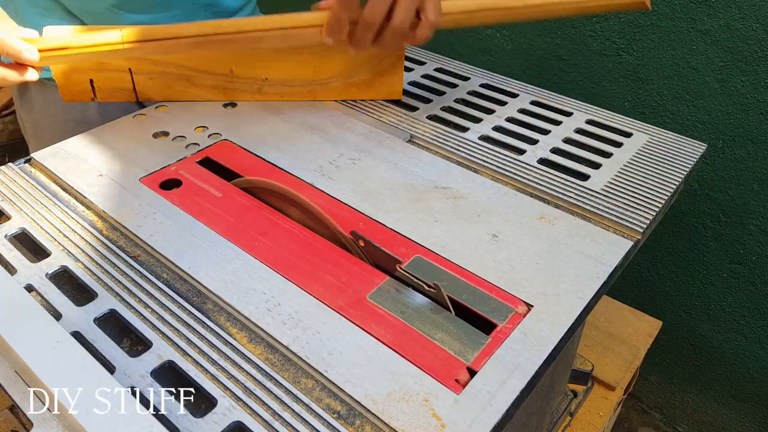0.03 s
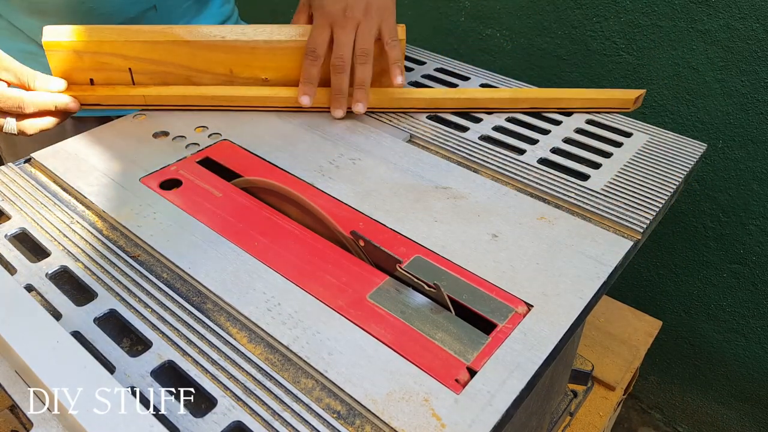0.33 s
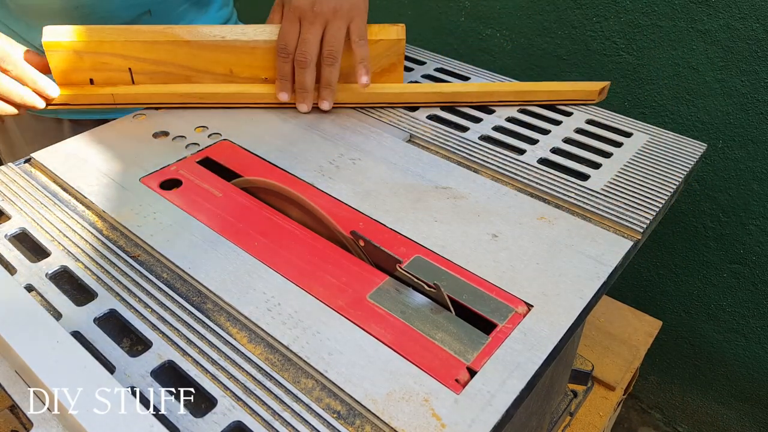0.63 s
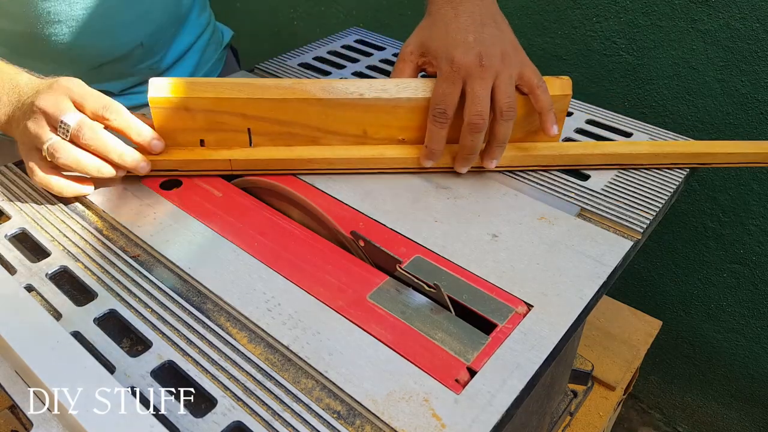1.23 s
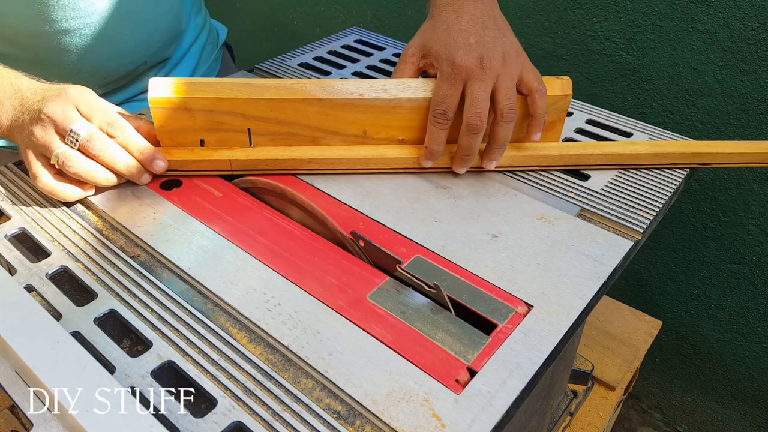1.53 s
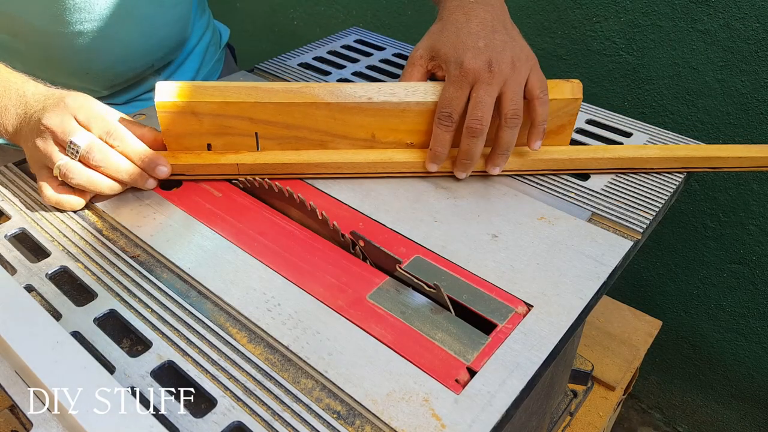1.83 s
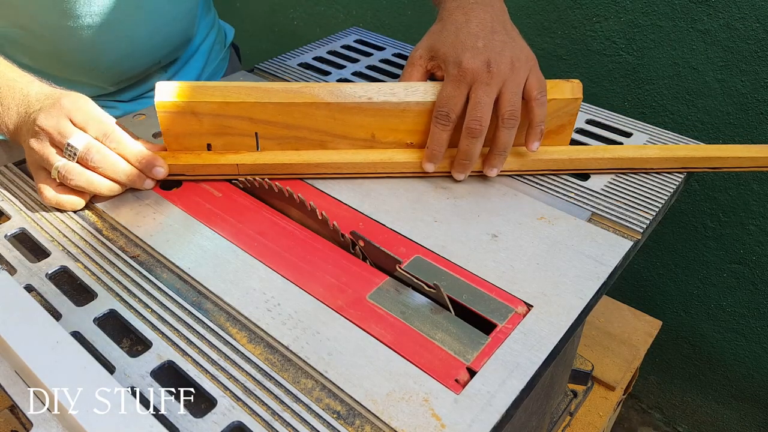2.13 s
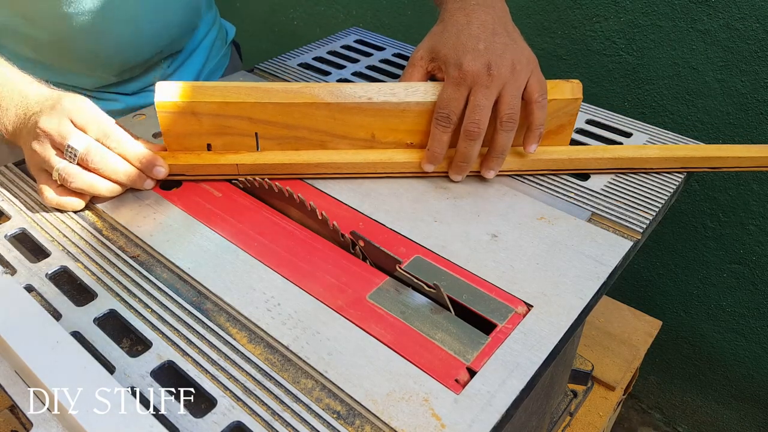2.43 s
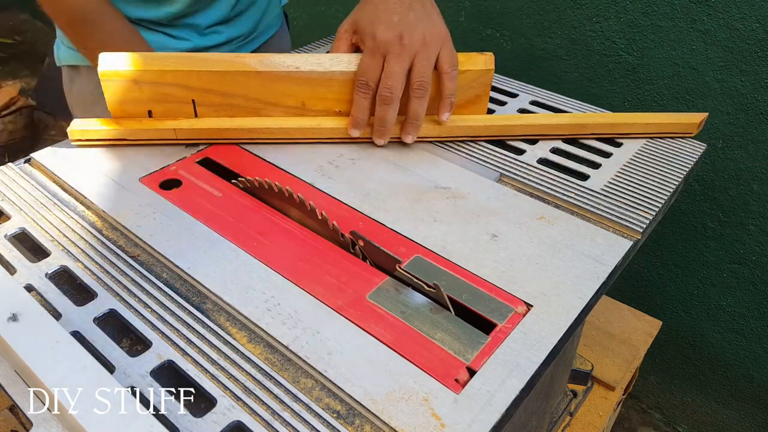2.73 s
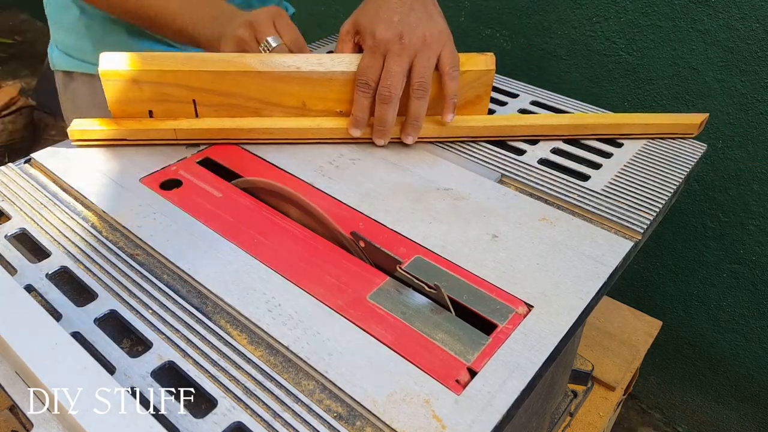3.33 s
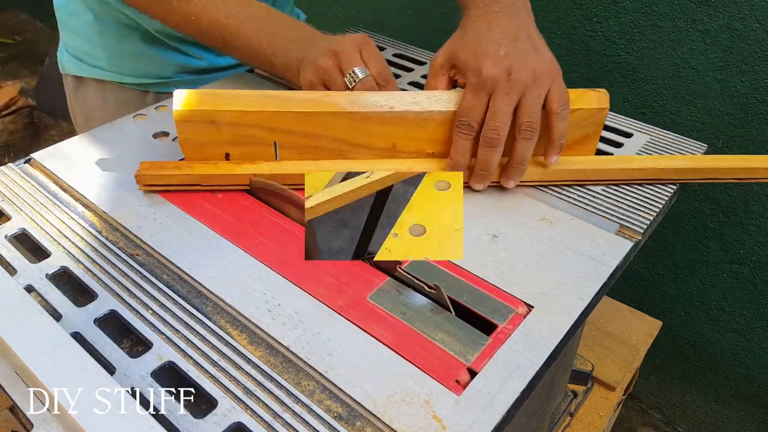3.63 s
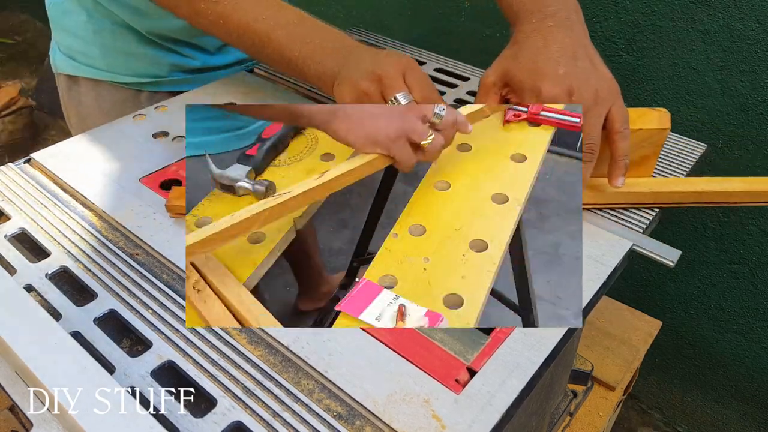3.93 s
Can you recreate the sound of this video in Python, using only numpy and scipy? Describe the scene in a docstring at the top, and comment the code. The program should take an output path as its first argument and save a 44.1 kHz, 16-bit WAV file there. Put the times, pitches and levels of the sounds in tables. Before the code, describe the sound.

A table saw coasts to a rattling stop, wood knocks and slides, then it restarts.

```python
"""Table saw stopping and restarting

A table saw, switched off, coasts down: its loose gears rattle in the housing, the motor whine sinks.
A wooden jig knocks and slides on the table, and faint high chirps dot the lull.
Then the saw starts again with a jolt and a mains buzz, and gears, fan and air whir up to full speed."""
import sys
import numpy as np
from scipy import signal
from scipy.fft import rfft, irfft, next_fast_len
from scipy.io import wavfile
from scipy.ndimage import map_coordinates

SR = 44100
rng = np.random.default_rng(int(sys.argv[2]) if len(sys.argv) > 2 else 0)


def transcribe(u):
    """Save the signal u as a 16-bit wav file named by the first command-line argument.

    u: samples, shape (n,) or (channels, n), limited to [-1, 1]; the rate is SR.
    q: integer samples, one column per channel.
    """
    v = np.clip(np.atleast_2d(u).T, -1, 1)
    q = np.round(v * 32767).astype(np.int16)
    wavfile.write(sys.argv[1], SR, q)


N = 176400
TIME = np.arange(N) / SR
COAST_HZ, STOP_S = 487.3, 1.88  # rotor speed at switch-off; moment of standstill
START_S, MAINS_PULSE_HZ = 3.157, 120
SINCE_START = np.maximum(TIME - START_S, 0)

# Faders of the coast-down, ahead of each layer's trim: time_s, housing_db, grind_db, rattle_db, hiss_db
COAST_FADERS = [(0, -30.5, -35.5, -25, -30), (.3, -28.5, -39, -26, -31.5), (.58, -30.5, -36, -26.5, -34),
                (.8, -33.5, -38, -26.5, -34.5), (1.08, -32, -34, -27, -36.5),
                (1.43, -34.5, -31.5, -35, -43), (1.54, -31.5, -34.5, -38, -49.5),
                (1.71, -37, -42.5, -50.5, -57), (1.745, -33, -50, -51, -65.5)]
# Modes of the blade and its shaft: pitch_hz, width_hz, level_db
BLADE_MODES = [(2460, 180, -4.5), (2727, 130, 2.5), (2954, 120, -0.5), (3275, 108, 4), (3650, 620, -7),
               (4310, 550, -8.5)]
# Faders of the run-up, ahead of each layer's trim: time_s, housing_db, gears_db, air_db
RUN_FADERS = [(3.157, -12, -8, -12), (3.172, -14, -9, -13.5), (3.205, -16.5, -16.5, -19),
              (3.255, -17, -21, -19.5), (3.32, -24, -27.5, -21), (3.44, -23, -31, -16.5),
              (3.6, -31.5, -25, -18), (3.652, -27, -34, -19.5), (3.68, -54, -19.5, -25),
              (3.87, -39, -25.5, -25), (4, -33, -34, -28.5)]


def amp(db):
    """Decibels to gain."""
    return 10 ** (np.asarray(db) / 20)


def unit(x):
    """x scaled to rms 1."""
    return x / np.sqrt(np.mean(x ** 2) + 1e-20)


def along(points, hz):
    """Read (frequency_hz, value) points on a log frequency axis."""
    knots_hz, values = np.transpose(points)
    return np.interp(np.log(hz + 1), np.log(knots_hz + 1), values)


def curves(rows):
    """One automation curve for each column after the time."""
    times, *columns = np.transpose(rows)
    return [np.interp(TIME, times, column) for column in columns]


def wobble(knots_per_s):
    """A smooth random curve."""
    return map_coordinates(rng.standard_normal(int(N * knots_per_s / SR) + 4), [TIME * knots_per_s])


def noise():
    """Mid and side white noise."""
    return rng.standard_normal((2, N))


def filtered(x, response):
    """x through a response given as a function of frequency."""
    size = next_fast_len(N + SR // 2)
    return irfft(rfft(x, size) * response(np.fft.rfftfreq(size, 1 / SR)), size)[..., :N]


def coloured(x, eq):
    """x through a (frequency_hz, gain_db) curve that keeps the power of white noise."""
    return filtered(x, lambda hz: unit(amp(along(eq, hz))))


def ringing(x, modes):
    """x through resonances with steep outer skirts, keeping the power of white noise."""
    def response(hz):
        gain = sum((-1) ** k * amp(db) * 1j * hz * width / (pitch ** 2 - hz ** 2 + 1j * hz * width)
                   for k, (pitch, width, db) in enumerate(modes))
        low, high = 1j * hz / (0.5 * modes[0][0]), 1j * hz / (1.74 * modes[-1][0])
        gain = gain * low ** 2 / (1 + low + low ** 2) / (1 + high + high ** 2)
        return gain / np.sqrt(np.mean(abs(gain) ** 2))
    return filtered(x, response)


def struck(start_s, t60_s):
    """An envelope that jumps up and dies away."""
    age = TIME - start_s
    return (age >= 0) * amp(-60 * np.maximum(age, 0) / t60_s)


def swell(peak_s, rise_s, fall_s):
    """A bell-shaped rise to 1 and fall."""
    return np.exp(-((TIME - peak_s) / np.where(TIME < peak_s, rise_s, fall_s)) ** 2)


def tones(hz, partials, flutter_db=1.5):
    """Mid and side partials (multiple, level_db) of a pitch, each fluttering by itself."""
    phase = 2 * np.pi * np.cumsum(np.broadcast_to(hz, N)) / SR
    knots = np.arange(0, N / SR, 1 / 20)
    total = 0
    for multiple, db in partials:
        level = np.interp(TIME, knots, amp(db + flutter_db * rng.standard_normal(len(knots))))
        total += level * np.sqrt(2) * np.sin(multiple * phase + rng.uniform(0, 2 * np.pi, (2, 1)))
    return total


def whirring(hz, spread_hz):
    """A band of noise reaching spread_hz to either side of a pitch, which may move."""
    flutter = filtered(noise(), lambda f: 1 / (1 + (f / spread_hz) ** 3))
    return unit(flutter * np.cos(2 * np.pi * np.cumsum(np.broadcast_to(hz, N)) / SR))


def backlash(per_s, scatter, life_s, spread_db=0.5):
    """Envelope of loose gear teeth knocking at a slightly uneven rate."""
    gaps, strengths = rng.standard_normal((1500, 2)).T
    count = np.cumsum(np.broadcast_to(per_s, N)) / SR
    at = np.searchsorted(count, np.cumsum(np.exp(scatter * gaps)))
    blows = np.bincount(at[at < N], amp(spread_db * strengths[at < N]), N)
    return unit(signal.lfilter([1], [1, -np.exp(-1 / (life_s * SR))], blows))


def coasting_gears(speed):
    """Loose gears chatter through housing, gearbox and blade, softening as speed falls from 1 to 0."""
    # Modes of the housing and of the gearbox: pitch_hz, width_hz, level_db
    housing_modes = [(309, 24.6, -3.5), (405, 34, -3), (489.2, 23, -4.5), (666.5, 25, -3.5),
                     (712.6, 17, -3), (809, 21.4, -7.5), (948.8, 33.3, 2.5), (1064, 27.2, 5)]
    gearbox_modes = [(1332, 140, -2.5), (1476, 66, 2), (1664, 38, 4), (1802, 47, 3.5), (2152, 204, -3)]
    chatter = [(.2, 97), (.29, 84), (.34, 62), (.43, 61), (.5, 73), (.8, 78)]  # pace of the loose teeth: time_s, knocks_per_s
    hiss_eq = [(100, -28), (300, -3.5), (1000, -9.5), (4000, 4), (5200, -1), (6700, -1), (10000, -7),
               (15500, -9.5)]  # colour of the hiss: frequency_hz, gain_db
    housing_db, grind_db, rattle_db, hiss_db = curves(COAST_FADERS)
    knocks = backlash(curves(chatter)[0], scatter=0.1, life_s=0.0028)
    looseness = np.clip(0.25 + 0.8 * speed, 0, 1)

    def chopped(depth):
        """Noise with part of its power pulsed by the knocks."""
        share = depth * looseness
        return noise() * np.sqrt(1 - share + share * knocks ** 2)

    housing = amp(housing_db) * unit(ringing(chopped(0.36), housing_modes))
    muffled = filtered(housing, lambda hz: 1 / (1 + (hz / 752) ** 6))
    hardness = np.clip(speed / 0.19, 0, 1)  # the last slow knocks lose their top
    housing = hardness * housing + (1 - hardness) * muffled
    grind = amp(grind_db) * unit(ringing(chopped(0.29), gearbox_modes))
    rattle = amp(rattle_db - 2.5) * unit(ringing(chopped(0.89), BLADE_MODES))
    sinking_band = whirring(7.6 * COAST_HZ * speed, spread_hz=490) * knocks
    whir = amp(rattle_db - 11) * ringing(sinking_band, gearbox_modes + BLADE_MODES) * np.sqrt(speed)
    hiss = amp(hiss_db + 4.5) * unit(coloured(chopped(0.26), hiss_eq))
    return housing + grind + rattle + whir + hiss


def coasting_whine(speed):
    """The motor's comb of partials sinks with the slowing rotor."""
    strong_partials = [(16, 7), (17, 6), (18, 4.5), (21, 3), (23, 3), (26, 4), (29, 0), (39, 6), (45, 5),
                       (55, 3.5)]  # peaks of the whine: rotor_multiple, relative_db
    whine_eq = [(1500, -26), (4000, -6), (6050, -2), (6650, 9), (7200, -4), (8300, -1), (9500, -8),
                (15000, -13)]  # colour of the whine: frequency_hz, gain_db
    *_, hiss_db = curves(COAST_FADERS)
    weak_db = -7
    partials = [(k, dict(strong_partials).get(k, weak_db)) for k in range(9, 56)]
    comb = tones(COAST_HZ * speed * (1 + 0.00097 * wobble(250)), partials)
    return amp(hiss_db - 4.5) * speed ** 0.16 * coloured(unit(comb), whine_eq)


def housing_ring(pitch_hz=470, fade_from_s=1.7, fade_db_per_s=72):
    """The housing's longest ring, which outlasts the rattle."""
    return tones(pitch_hz, [(1, -43.5)]) * amp(-fade_db_per_s * np.maximum(TIME - fade_from_s, 0))


def room_tone():
    """Quiet room noise and a weak rumble that comes and goes."""
    floor_eq = [(70, -25), (220, 0), (420, -3), (900, -7.5), (2000, -10), (5500, -19)]  # colour of the room noise: frequency_hz, gain_db
    rumble_fader = [(.4, -59), (.6, -88), (1.42, -86), (1.5, -59), (1.85, -71.5), (3.1, -95), (3.2, -83),
                    (3.8, -49.5), (4, -64)]  # swells of the bass: time_s, level_db
    rumble_eq = [(25, -7), (60, -18), (150, -7.5), (300, -11), (1000, -73)]  # frequency_hz, gain_db
    rumble_db, = curves(rumble_fader)
    return amp(-59.5) * coloured(noise(), floor_eq) + amp(rumble_db) * coloured(noise(), rumble_eq)


def jig_knocks():
    """Each contact is a brief crack and a ring of wood and table."""
    knocks = [(0.2583, -29.5, -13.5), (1.475, -34, -44), (2.038, -50.5, -61), (2.762, -35, -49),
              (2.772, -32.5, -40)]  # wood hitting the table: start_s, body_db, crack_db
    wood_modes = [(300, 8.3, 0), (400, 31, -1.5), (422, 33, 0.5), (675, 66, -6), (940, 89, -0.5),
                  (1280, 100, -5.5), (1653, 140, -6.5), (2650, 380, -10.5)]  # modes of jig and table: pitch_hz, width_hz, level_db
    crack_eq = [(200, -24.5), (1500, -9), (3500, -2), (6000, 1), (8000, -7.5), (15000, -17.5)]  # colour of the crack: frequency_hz, gain_db
    body = sum(amp(db) * struck(start_s, t60_s=0.095) for start_s, db, _ in knocks)
    crack = sum(amp(db) * struck(start_s, t60_s=0.062) for start_s, _, db in knocks)
    return ringing(body * noise(), wood_modes) + crack * coloured(noise(), crack_eq)


def jig_slides():
    """Grainy friction of the wooden jig, swelling and fading with each push, with a hoarse squeak; the last
    scrape is the saw's switch being flicked."""
    # Pushes across the table, the last row being the scrape of the saw's switch: peak_s, nominal_rise_s,
    # nominal_fall_s, level_db, squeak_hz
    slides = [(1.44, 0.088, .035, -42.5, 13140), (1.794, .02, 0.072, -46, 2390),
              (1.964, 0.0086, 0.084, -56.5, 9100), (2.219, 0.026, 0.081, -58.5, 1775),
              (2.39, 0.076, 0.1, -56, 1940), (2.49, 0.022, 0.068, -49.5, 8700),
              (2.58, 0.028, 0.076, -43.5, 1440), (2.635, 0.03, 0.084, -39, 693),
              (2.989, 0.027, 0.21, -59, 8400), (3.155, 0.031, .02, -37, 1500)]
    friction_eq = [(100, -35.5), (200, -22.5), (340, -2), (460, -9), (700, -4), (1100, -5.5), (4200, -9.5),
                   (5000, -12), (15500, -17)]  # colour of the rubbing: frequency_hz, gain_db
    pushes = [(amp(db) * swell(peak_s, 0.8 * rise, 0.78 * fall), hz)
              for peak_s, rise, fall, db, hz in slides]
    grain = unit(noise() * amp(2 * wobble(700)))
    friction = sum(force for force, _ in pushes) * coloured(grain, friction_eq)
    squeaks = sum(force * whirring(hz, spread_hz=0.0325 * hz) for force, hz in pushes)
    return friction + amp(-5) * squeaks


def faint_chirps():
    """High, raspy chirps that sag in pitch while the saw is still or nearly so."""
    chirps = [(1.5888, -37, 8560), (1.6593, -40, 8510), (1.7155, -42, 8150), (1.8781, -46, 7740),
              (1.9844, -48, 7900), (2.0592, -47, 7720), (2.138, -47, 8120), (2.2099, -49, 7640),
              (2.2722, -46, 7750), (2.3351, -46, 7930)]  # chirps in the lull: start_s, relative_db, pitch_hz
    rise_s, t60_s, sag_hz_per_s = 0.004, 0.11, 5000
    total = 0
    for start_s, db, hz in chirps:
        age = np.clip(TIME - start_s, 0, t60_s)
        pitch = hz - sag_hz_per_s * age
        ring = whirring(pitch, spread_hz=250) + amp(-7) * whirring(2 * pitch, spread_hz=500)
        rasp = amp(-4) * noise()
        envelope = struck(start_s, t60_s) * (1 - np.exp(-age / rise_s))
        total += amp(db - 6.5) * envelope * (ring + rasp)
    return total


def start_jolt(pitch_hz=926.35):
    """The kick of the starting motor, one short ringing note."""
    return tones(pitch_hz, [(1, -12.5)]) * struck(START_S, t60_s=0.21)


def mains_buzz(fade_db_per_s=21, end_s=3.68):
    """The inrush of current buzzes on harmonics of the mains pulse and dies away."""
    partials = [(3, -32.5), (6, -28), (8, -32)]  # harmonics of the buzz: pulse_multiple, level_db
    release = np.clip((end_s - TIME) / 0.035, 0, 1)
    return tones(MAINS_PULSE_HZ, partials) * amp(-fade_db_per_s * SINCE_START) * release


def driven_gears(inrush):
    """Knocking teeth and the pulsing inrush of current shake the housing and the blade."""
    loaded_modes = [(287, 70, -3), (342, 72, 2.5), (464, 160, -4.5), (648, 79, 4.5), (737, 54, 1.5),
                    (948, 87, 4), (1060, 110, -0.5), (1340, 110, -0.5), (1705, 69, -7)]  # the housing under load: pitch_hz, width_hz, level_db
    housing_db, gears_db, _ = curves(RUN_FADERS)
    knocks = np.sqrt(1 + 0.28 * backlash(per_s=170, scatter=0.36, life_s=0.0034) ** 2)
    housing = amp(housing_db - 4.5) * ringing(noise() * inrush * knocks, loaded_modes)
    gears = amp(gears_db - 11.5) * ringing(noise() * inrush * knocks, BLADE_MODES)
    return housing + gears


def rushing_air(rotor_hz, inrush):
    """The rush of air brightens and the fan's hoarse whine rises with the rotor."""
    # The air's treble, its low end and its tilt while the rotor is slow: frequency_hz, gain_db
    treble_eq = [(2000, -9), (2900, -3.5), (4200, -2), (5200, -4), (7500, -2.5), (11600, -3.5),
                 (15500, -4.5)]
    low_eq = [(130, -24), (300, -6), (1500, 2), (2300, -4.5)]
    slow_eq = [(300, -1), (4000, 0), (15500, -12)]
    *_, air_db = curves(RUN_FADERS)
    rush = coloured(coloured(noise(), treble_eq), low_eq)
    dull_rush = filtered(rush, lambda hz: amp(along(slow_eq, hz)))
    brightness = (rotor_hz / rotor_hz.max()) ** 3
    air = amp(air_db + 1.5) * (brightness * rush + (1 - brightness) * dull_rush) * inrush
    fan = amp(air_db - 12.5) * whirring(17 * rotor_hz, spread_hz=710)
    return air + fan


def rising_whine(rotor_hz):
    """The motor whines upward; the gear mesh, then the blade, sing briefly on the way to full speed."""
    partials = [(6, -8), (9, -1.5), (22, -9)]  # the motor's whine: rotor_multiple, relative_db
    blade_notes = [(3.595, .045, 7, -30), (3.775, .025, 6, -31.5), (3.785, .03, 5.55, -36),
                   (3.845, .04, 6, -31.5), (3.89, .035, 9, -34)]  # the singing blade: peak_s, half_length_s, rotor_multiple, level_db
    mesh_multiple = 9
    unsteady_hz = rotor_hz * (1 + 0.0019 * wobble(200))
    motor = amp(-39.5) * tones(unsteady_hz, partials) * (rotor_hz / rotor_hz.max()) ** 2
    mesh = tones(unsteady_hz, [(mesh_multiple, 0)]) + whirring(mesh_multiple * rotor_hz, spread_hz=130)
    mesh *= amp(-29) * swell(peak_s=3.47, rise_s=0.14, fall_s=0.14)  # passing a resonance
    blade = sum(tones(unsteady_hz, [(multiple, db)]) * swell(peak_s, half_s, half_s)
                for peak_s, half_s, multiple, db in blade_notes)
    return motor + mesh + blade


def room_reverb(x):
    """The near walls answer; the treble dies first."""
    decay = [(200, 0.33), (2000, 0.23), (12000, 0.11)]  # the room's decay times: frequency_hz, t60_s
    hz, age, spectrum = signal.stft(rng.standard_normal((2, SR // 2)), SR, nperseg=256)
    _, tail = signal.istft(spectrum * amp(-60 * age / along(decay, hz)[:, None]), SR, nperseg=256)
    return signal.fftconvolve(x, tail / np.linalg.norm(tail[0]), axes=1)[:, :N]


def scene():
    """Coast-down, lull and restart in one room, narrow in the low mids and wide in the treble."""
    run_up = [(3.157, 60), (3.25, 289), (3.365, 421), (3.46, 457), (3.53, 485), (3.64, 499), (3.75, 503)]  # the rotor gathering speed: time_s, speed_hz
    stereo_width = [(60, -3), (130, -3.5), (300, -17), (600, -15.5), (1290, -12), (2400, -8.5), (4400, -4),
                    (8000, 0.5)]  # spread of the image: frequency_hz, side_gain_db
    speed = np.clip(1 - TIME / STOP_S, 0, 1) ** 1.24
    stop_fade = amp(-330 * np.maximum(TIME - 1.73, 0))  # 330 dB a second, just before standstill
    coasting = (coasting_gears(speed) + coasting_whine(speed)) * stop_fade + housing_ring()

    rotor_hz, = curves(run_up)
    inrush = 1 + 0.18 * np.exp(-SINCE_START / 0.1) * np.cos(2 * np.pi * MAINS_PULSE_HZ * SINCE_START)
    switch_on = 1 - np.exp(-SINCE_START / 0.0028)
    running = driven_gears(inrush) + rushing_air(rotor_hz, inrush) + rising_whine(rotor_hz)
    restart = (start_jolt() + mains_buzz() + running) * switch_on

    direct = coasting + jig_knocks() + jig_slides() + faint_chirps() + restart
    mid, side = direct + amp(-10.5) * room_reverb(direct) + room_tone()
    side = filtered(side, lambda hz: amp(along(stereo_width, hz)))
    return np.array([mid + side, mid - side])


def record(dry):
    """A brick-wall low-pass takes off the very top."""
    return filtered(dry, lambda hz: hz < 15850)


dry = scene()
out = record(dry)
transcribe(out)
```